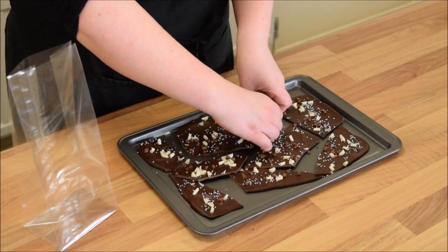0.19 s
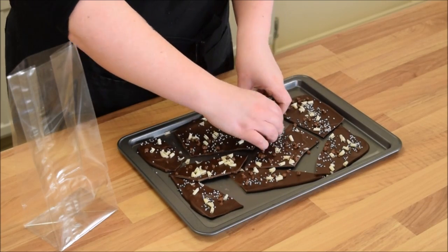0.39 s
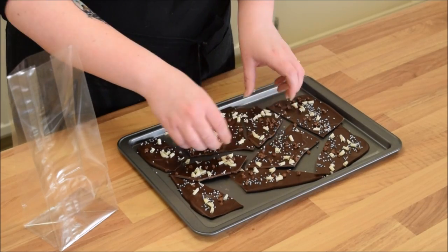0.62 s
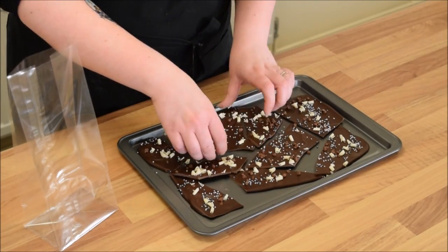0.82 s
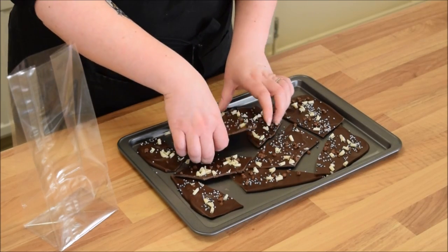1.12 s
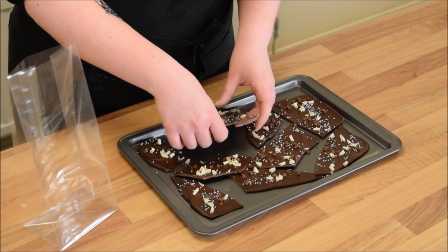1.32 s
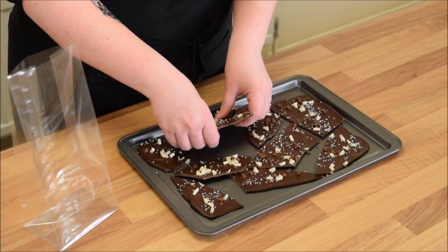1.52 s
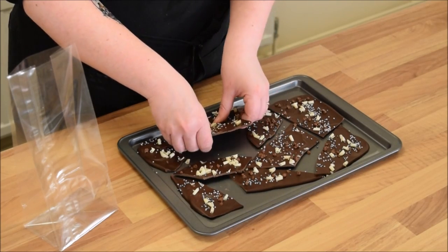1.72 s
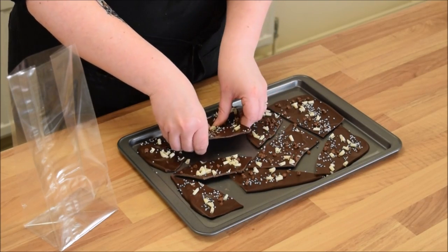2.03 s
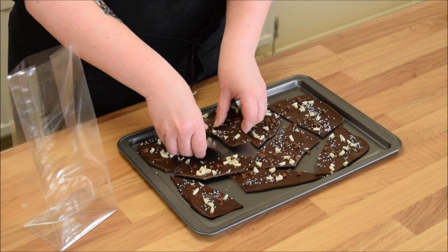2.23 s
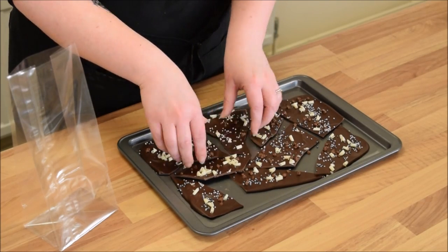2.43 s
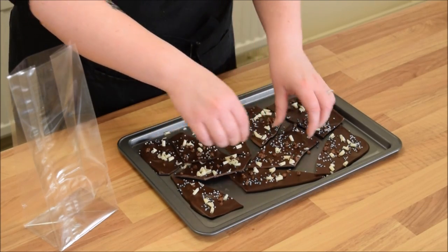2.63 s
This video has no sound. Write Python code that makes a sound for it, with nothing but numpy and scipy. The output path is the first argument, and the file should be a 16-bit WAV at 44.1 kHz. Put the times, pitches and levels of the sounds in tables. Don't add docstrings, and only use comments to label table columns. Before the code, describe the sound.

Hands snap brittle slabs of set chocolate over a metal baking tray in a small kitchen.

```python
import sys
import numpy as np
from scipy import signal
from scipy.io import wavfile

SR = 44100
rng = np.random.default_rng(int(sys.argv[2]) if len(sys.argv) > 2 else 0)


def nominal_scale(level):
    x = np.asarray(level, float) / 20
    return 10 ** x


def inscribe(sig):
    pcm = np.round(np.clip(np.atleast_2d(sig).T, -1, 1) * 32767)
    wavfile.write(sys.argv[1], SR, pcm.astype(np.int16))


N = 121275

# f/Hz, density level/dB per Hz
AIR_SPECTRUM = [(18, -42), (30, -22), (115, -9), (415, -6.5), (526, -5.5), (2010, -8.5), (2230, -10.5),
                (3310, -15.5), (16000, -34.5)]
# f/Hz, width/Hz, level/dB
HUM_BANDS = [(67.3, 12, -76.5), (114.6, 14, -72.5), (216, 50, -71.5), (2923, 140, -69)]
# f/Hz, level/dB
WHINE_TONES = [(2255, -67.5), (6584, -83.5), (527, -72), (9030, -92)]
# f/Hz, likeness [0..1]
AIR_LIKENESS = [(60, 0.99), (240, 0.9), (950, 0.67), (3770, 0.024), (15000, 0.26)]
# f/Hz, t60/s
ROOM_T60 = [(200, 0.74), (1000, 0.36), (4000, 0.21), (12000, 0.2)]
# t/s, level/dB, centre f/Hz, length/s
SLIDES = [(.022, -53, 6000, 0.015), (1.038, -63.5, 6000, 0.035), (1.167, -61, 6400, 0.058),
          (1.163, -55.5, 1540, 0.059), (.89, -66, 7950, 0.12), (2.268, -50.5, 2380, 0.055),
          (2.332, -50.5, 6000, 0.043), (2.353, -52.5, 3800, 0.033), (2.407, -56, 6000, 0.016),
          (2.51, -51, 5000, 0.022), (2.561, -53, 6000, 0.0086)]
# t/s, peak level/dB, f/Hz
TICKS = [(0.2409, -14, 1640), (0.2439, -19, 3040), (0.2486, -24, 1330), (0.2534, -22, 1700),
         (.2589, -27, 1960), (0.286, -27.5, 1380), (.2981, -31, 1740), (0.303, -40, 1250),
         (0.3935, -34, 3060), (.4423, -41, 1750), (.4595, -38, 1600), (.6045, -28, 3050),
         (.6069, -11, 1660), (0.6146, -24.5, 1110), (.634, -28, 1570), (0.6478, -34, 1660),
         (.667, -38, 830), (.8617, -34.5, 990), (.8844, -26, 2110), (1.0305, -30.5, 1940),
         (1.5374, -31, 1080), (1.5579, -29.5, 2220), (1.5665, -29, 1310), (2.2907, -33.5, 780),
         (2.2945, -29.5, 3020), (2.3067, -36, 1560), (2.384, -41, 3100), (2.43, -38, 2410),
         (2.4448, -23, 2020), (2.4402, -30.5, 1310), (1.1286, -40, 2000), (1.8167, -38, 4100),
         (2.4491, -31.5, 814), (2.4539, -24, 2370), (2.4727, -28, 2200), (2.4781, -30, 1500),
         (2.4805, -25.5, 1760), (2.4904, -34, 830), (2.4966, -36, 930), (2.52, -40, 2750),
         (2.5211, -34, 2080), (2.544, -38, 1690)]
# t/s, f/Hz, peak level/dB, t60/s
SLAB_NOTES = [(.252, 724, -35.5, 0.051), (.25, 396, -39.5, 0.13), (.39, 1692, -35, 0.04),
              (.441, 1780, -38.5, 0.042), (.604, 2820, -25, 0.041), (.612, 1012, -30, 0.076),
              (.6095, 1560, -24, 0.027), (.625, 367, -40, 0.076), (.615, 699, -33, 0.087),
              (.66, 269, -43, 0.17), (.028, 763, -52.5, 0.25), (1.545, 1280, -24, 0.035),
              (1.547, 2024, -40, 0.087), (1.548, 2230, -40, 0.13), (1.555, 360, -44, 0.026),
              (1.814, 3580, -39.5, 0.015), (2.11, 2160, -31, .025), (2.112, 1212, -33.5, 0.079),
              (2.116, 689, -29.5, 0.15), (2.12, 383, -49, 0.1), (2.125, 253, -48.5, 0.25),
              (2.288, 680, -42, .08), (2.29, 325, -40, 0.037), (2.47, 383, -42.5, 0.12),
              (2.477, 1580, -29.5, 0.026), (.2425, 1776, -18.5, 0.024), (.243, 1445, -23, .03),
              (0.242, 4030, -18, 0.019), (.241, 3090, -23, 0.018), (.39, 3110, -38, 0.021),
              (.39, 4170, -42.5, 0.014), (0.442, 4030, -46.5, .03), (.606, 4000, -27, 0.022),
              (0.606, 3160, -20, 0.023), (.609, 1750, -23, 0.031), (1.59, 272, -49, 0.14)]
# f/Hz, level/dB, t60/s
TRAY_MODES = [(253, -10, 0.092), (383, -4, 0.036), (536, 1, 0.023), (752, -7, 0.1), (880, -7, 0.059),
              (1030, -19, 0.041), (1250, -13, 0.038), (1380, -32, 0.073), (1560, -10, 0.055),
              (1770, -2, 0.05), (1990, -1.5, 0.11), (2300, 5.5, 0.033), (3050, 1, 0.045), (3220, -27, 0.03)]
# t/s, peak level/dB, body level/dB, treble level/dB, contact run/s
KNOCKS = [(0.015, -45.5, 1, -24, 0.0027), (0.129, -47.5, 1, -12, 0.0047), (0.389, -33, -14, -9.5, 0.0078),
          (0.412, -38.5, -3, -12, 0.0095), (0.44, -40, -14, -17.5, 0.011),
          (0.457, -41.5, -4.5, -11.5, 0.017), (0.631, -31, 1.5, -24, 0.0041),
          (0.679, -41.5, -5, -16, 0.011), (0.858, -33, -4, -22, 0.006), (0.88, -30.5, -8, -13, 0.0076),
          (0.915, -43.5, 0.5, -16, 0.017), (1.005, -40.5, -0.5, -19, 0.0061),
          (1.028, -36.5, -5.5, -12.5, 0.0093), (1.118, -42, 5.5, -18, 0.0051),
          (1.127, -40, -6, -19, 0.0067), (1.154, -47, 3.5, -14, 0.019), (1.813, -32.5, -15, -12.5, 0.0061)]
# t/s, peak level/dB, body level/dB, treble level/dB, contact run/s
SET_DOWNS = [(2.162, -46, 6.5, -22, 0.0076), (2.281, -36.5, 2.5, -10, 0.0067),
             (2.291, -36, -2.5, -12, 0.012), (2.309, -43, 1, -9, 0.012), (2.384, -41.5, -9, -10, 0.0064),
             (2.418, -38, -10, -24, 0.0072), (2.427, -28.5, -11, -23, 0.0073),
             (2.437, -22, -10.5, -7, 0.0062), (2.453, -29, -9.5, -25, 0.0099),
             (2.468, -36.5, -1, -23, 0.01), (2.477, -37, 3, -23, 0.0063), (2.488, -45, 2, -25, 0.0028),
             (2.518, -34.5, 0, -11.5, 0.0082), (2.534, -44.5, 1, -29, 0.0076),
             (2.727, -49.5, 3, -20, 0.0053), (2.746, -35, -14, -13, 0.0046)]
# t/s, peak level/dB, body level/dB, treble level/dB, crack run/s
SNAPS = [
    (0.23, -20.5, -16.5, -11, 0.0089),
    (0.24, -17.5, -20, -5.5, 0.0051),
    (0.603, -17.5, -9.5, -17, 0.0024),
    (0.606, -16.5, -19, -14.5, 0.0056),
    (1.537, -24.5, -12, -11.5, 0.0065),
    (1.545, -30.5, -9.5, -9, 0.0057),
    (2.109, -22.5, -10, -2, 0.0049),
]

BAND_EDGES_HZ = 30 * 2 ** np.arange(0, 9.3, .5)
AIR_DB, PAN_DB = -55.5, .3
ROOM_DB, ROOM_LIKENESS, SLAB_TO_ROOM_DB = -10, 0.98, -8
SIDE_DB, SIDE_HZ, SIDE_S = -13, 6000, 0.026
LOW_SIDE_DB, LOW_SIDE_HZ = -21.5, (1930, 4800)
LOW_CUT_HZ, SLAB_CUT_HZ, TOP_HZ = 265, 204, 14800
CRACKS_PER_S, CRACK_SPREAD_DB, FIRST_CRACK, HISS = 3000, 4, 0.13, 0.43
AFTER_DB, AFTER_RUNS = -15.5, 8.6
ONSET_DELAY_S, SET_DOWN_RISE_S = .0008, 0.0027
BODY_HZ, SHOULDER_HZ, TREBLE_HZ = (562, 1400), (1024, 3850), (4800, 10230)
TRAY_DB, TRAY_SPREAD_DB, TRAY_DETUNE = -18, 0.5, .04
PUSH_S, PUSH_SHARE = 0.0032, .06
TICK_CYCLES = 10.6


def rms_one(x):
    return x / np.sqrt(np.mean(x ** 2) + 1e-20)


def peak_one(x):
    return x / np.abs(x).max()


def at_hz(points, hz):
    f, value = np.array(points).T
    return np.interp(np.log(hz), np.log(f), value)


def band(x, low, high):
    return signal.sosfilt(signal.butter(2, [low, min(high, .45 * SR)], "band", fs=SR, output="sos"), x)


def high_pass(x, order, hz):
    return signal.sosfilt(signal.butter(order, hz, "high", fs=SR, output="sos"), x)


def ring(x, hz, t60):
    r, w = nominal_scale(-60 / (t60 * SR)), 2 * np.pi * hz / SR
    return signal.lfilter([0, np.sin(w)], [1, -2 * r * np.cos(w), r * r], x + 1e-18)


def add(out, s, x):
    i = int(s * SR)
    out[i:i + len(x)] += x[:N - i]


def two_capsules(mid, side, likeness):
    alike = np.clip(likeness, 0, 1)
    return np.sqrt(1 + alike) * mid + np.sqrt(1 - alike) * side * [[1], [-1]]


def cracks(size):
    hit, big, sign = rng.random((3, size))
    hit[0], big[0] = 0, FIRST_CRACK
    height = nominal_scale(-CRACK_SPREAD_DB * np.log(big + 0.16))
    return (hit < CRACKS_PER_S / SR) * height * np.sign(sign - .5)


def air():
    settle = 4000
    out, white = 0, rng.standard_normal((2, 2, N + settle))
    for k, (lo, hi) in enumerate(zip(BAND_EDGES_HZ, BAND_EDGES_HZ[1:])):
        centre = np.sqrt(lo * hi)
        mid, side = band(white[k % 2], lo, hi)[:, settle:]
        out = out + nominal_scale(at_hz(AIR_SPECTRUM, centre)) * two_capsules(mid, side, at_hz(AIR_LIKENESS, centre))
    appliance, t = np.zeros(N), np.arange(N) / SR
    for hz, width, db in HUM_BANDS:
        appliance += nominal_scale(db) * rms_one(band(rng.standard_normal(N), hz - width / 2, hz + width / 2))
    for hz, db in WHINE_TONES:
        appliance += nominal_scale(db) * np.sqrt(2) * np.sin(2 * np.pi * hz * t)
    return nominal_scale(AIR_DB) * rms_one(out) + appliance


def kitchen(x):
    t = np.arange(SR // 2) / SR
    mid, side, near = rng.standard_normal((3, len(t)))
    white = two_capsules(mid, side, ROOM_LIKENESS)
    tail = 0
    for lo, hi in zip(BAND_EDGES_HZ[4::2], BAND_EDGES_HZ[6::2]):
        tail = tail + band(white, lo, hi) * nominal_scale(-60 * t / at_hz(ROOM_T60, np.sqrt(lo * hi)))
    tail = tail * np.clip(t / 0.0006, 0, 1)
    early = near * np.exp(-t / SIDE_S)
    high_side = band(early, SIDE_HZ, SR / 2) * [[1], [-1]]
    low_side = band(early, *LOW_SIDE_HZ) * [[1], [-1]]
    answer = 0
    for db, part in ((ROOM_DB, tail), (SIDE_DB, high_side), (LOW_SIDE_DB, low_side)):
        energy = np.mean(np.sum(part ** 2, axis=1))
        answer = answer + nominal_scale(db) * part / np.sqrt(energy)
    return signal.fftconvolve(x[None], answer, axes=1)[:, :N]


def slides():
    out = np.zeros(N)
    for s, db, hz, length in SLIDES:
        t = np.arange(4000) / SR / length
        grit = cracks(4000) + 0.43 * rng.standard_normal(4000)
        stroke = np.sin(np.pi * np.clip(t, 0, 1) ** 0.87)
        add(out, s, nominal_scale(db) * rms_one(band(grit, hz / 2, hz * 1.65)) * stroke)
    return out


def ticks():
    out, click = np.zeros(N), np.zeros(1500)
    click[0] = 1
    for s, db, hz in TICKS:
        add(out, s, -nominal_scale(db) * peak_one(ring(click, hz, TICK_CYCLES / hz)))
    return out


def slabs():
    out, t = np.zeros(N), np.arange(8000) / SR
    for s, hz, db, t60 in SLAB_NOTES:
        push = rng.standard_normal(len(t)) * np.exp(-t / min(PUSH_S, PUSH_SHARE * t60))
        add(out, s, nominal_scale(db) * peak_one(ring(push, hz, t60)))
    return high_pass(out, 2, SLAB_CUT_HZ)


def shaken_tray(force, body_db):
    out = np.zeros(len(force))
    for (hz, db, t60), luck in zip(TRAY_MODES, rng.standard_normal(len(TRAY_MODES))):
        level = db + TRAY_SPREAD_DB * luck + (body_db + 12.0) * (hz < BODY_HZ[1])
        out += nominal_scale(level) * ring(force, hz * (1 + TRAY_DETUNE * np.sin(9 * luck)), t60)
    return out / np.sqrt(np.sum(force ** 2))


def contacts(rows, rise):
    out, t = np.zeros(N), np.arange(8000) / SR
    for s, db, body_db, treble_db, run in rows:
        run = max(run, .0005)
        grit = cracks(len(t)) + HISS * rng.standard_normal(len(t))
        decay = np.exp(-t / run) + nominal_scale(AFTER_DB) * np.exp(-t / (AFTER_RUNS * run))
        force = grit * decay * np.minimum(1, (t + 1 / SR) / rise)
        deep, bright = force * rng.choice([-1, 1], (2, len(t)))
        edge = peak_one(band(band(force, *SHOULDER_HZ), 570, 6000))
        body = nominal_scale(body_db) * peak_one(band(deep, *BODY_HZ))
        treble = nominal_scale(treble_db + 3.5) * peak_one(band(bright, *TREBLE_HZ))
        tray = nominal_scale(TRAY_DB) * shaken_tray(force, body_db)
        add(out, s + ONSET_DELAY_S, nominal_scale(db) * (edge + body + treble + tray))
    return out


def scene():
    hits = contacts(SNAPS + KNOCKS, 1 / SR) + contacts(SET_DOWNS, SET_DOWN_RISE_S)
    hits = high_pass(hits + slides() + ticks(), 4, LOW_CUT_HZ)
    notes = slabs()
    room = kitchen(hits + nominal_scale(SLAB_TO_ROOM_DB) * notes)
    return (hits + notes + room + air()) * nominal_scale(np.array([[-PAN_DB], [PAN_DB]]))


def top_cut(x):
    return signal.sosfilt(signal.butter(12, 16100, fs=SR, output="sos"), x)


def record(dry):
    mix = signal.sosfilt(signal.butter(6, TOP_HZ, fs=SR, output="sos"), dry)
    return top_cut(mix)


dry = scene()
out = record(dry)
inscribe(out)
```